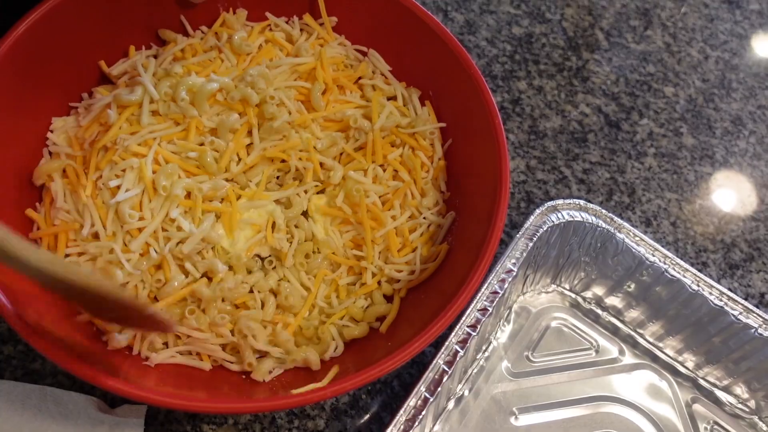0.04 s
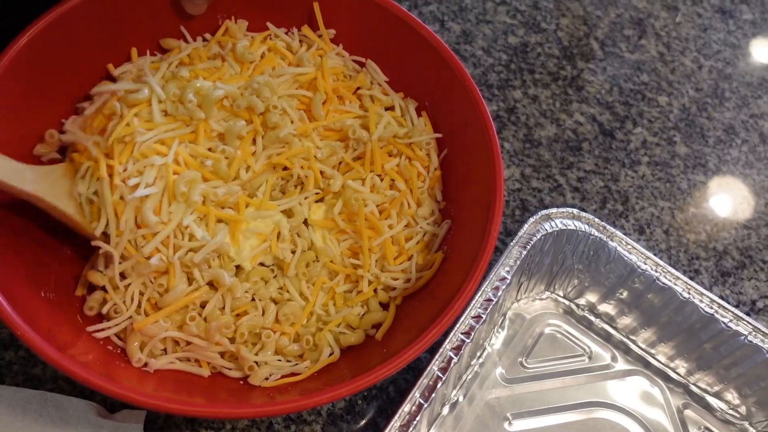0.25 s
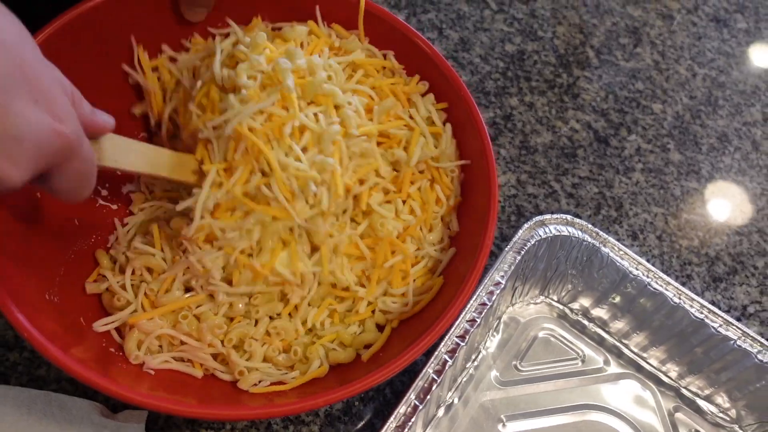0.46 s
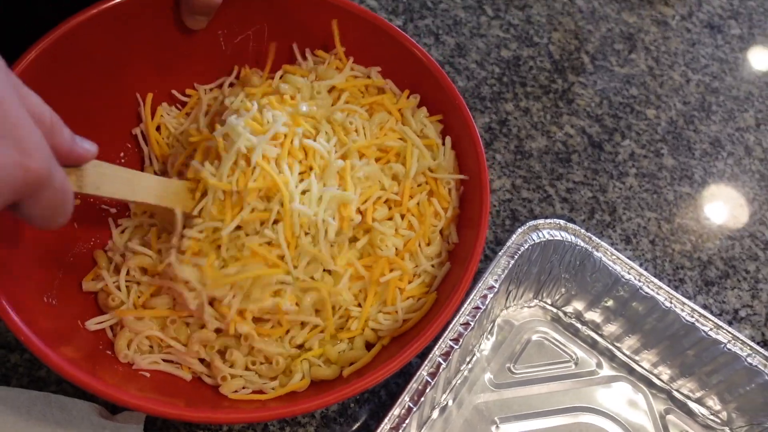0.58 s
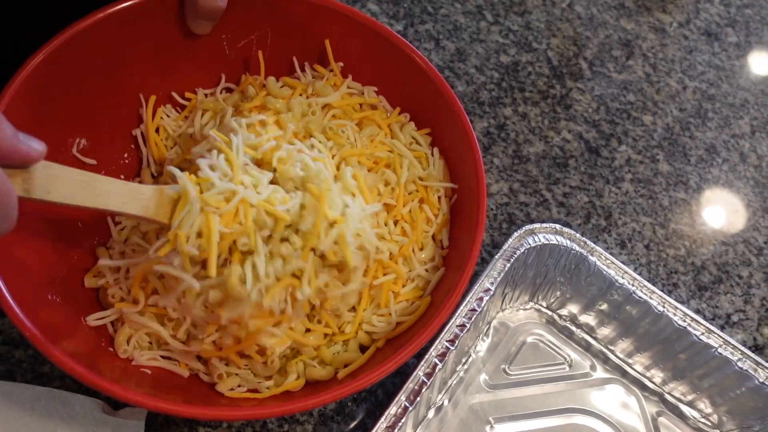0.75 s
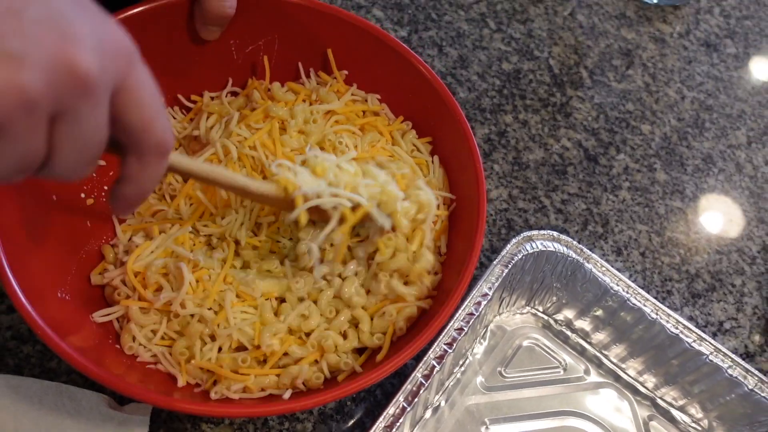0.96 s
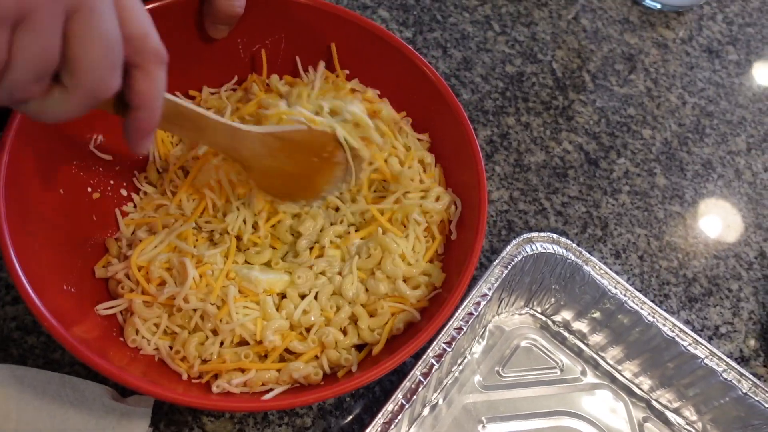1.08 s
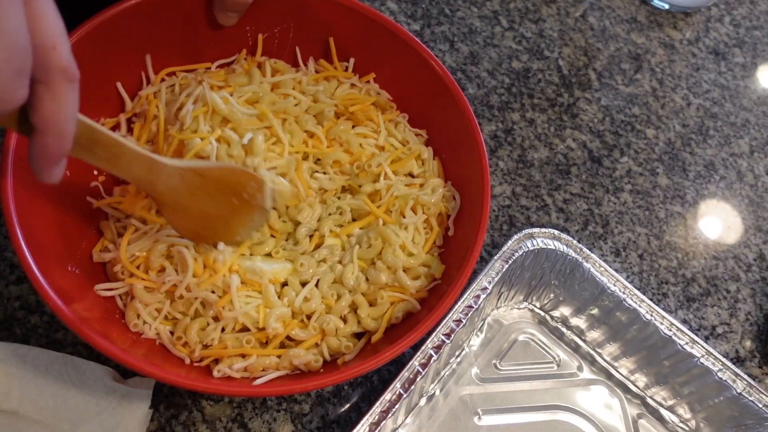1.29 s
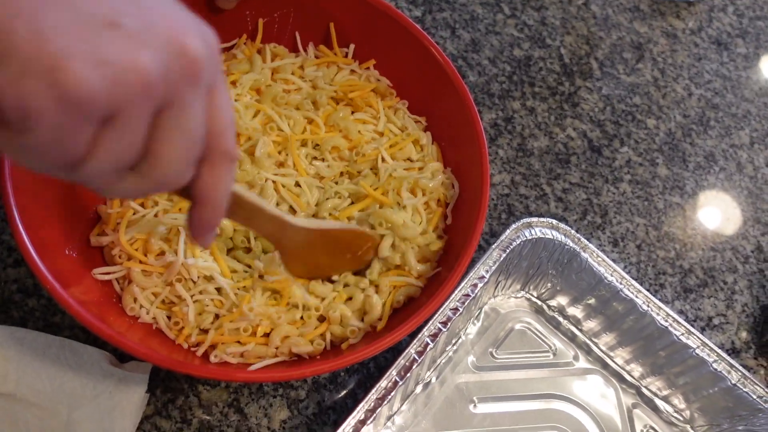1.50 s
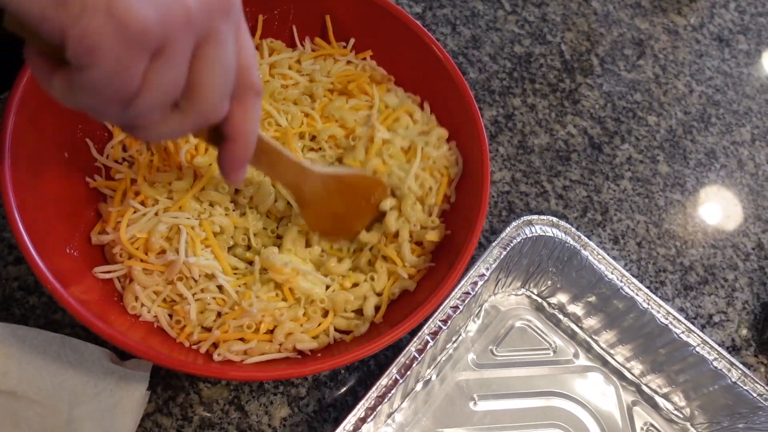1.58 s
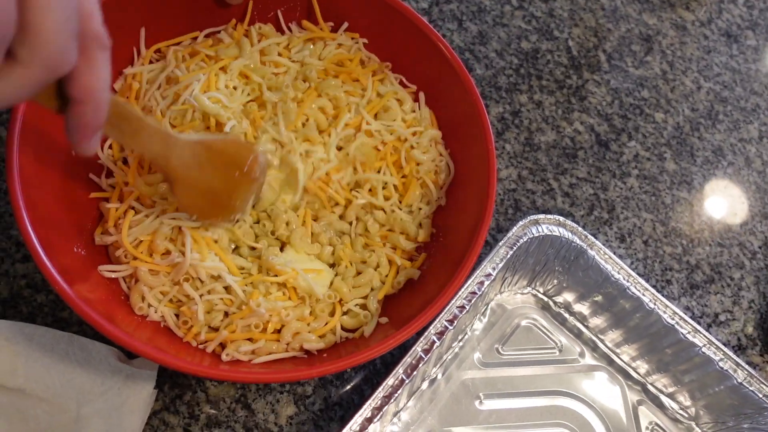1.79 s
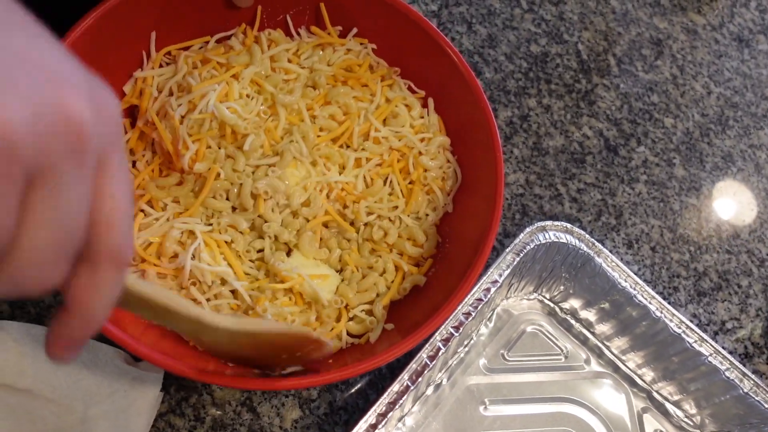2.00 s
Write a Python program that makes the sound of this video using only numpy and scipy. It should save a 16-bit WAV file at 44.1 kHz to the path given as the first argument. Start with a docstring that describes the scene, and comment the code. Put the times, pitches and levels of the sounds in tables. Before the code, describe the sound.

A spoon clacks twice on a plastic bowl, scrapes through wet pasta, then quiets to faint stirring

```python
"""Quiet room air, then a wooden spoon knocks and scrapes on a plastic bowl, stirring pasta and shredded cheese.
Knocks and scraping excite the same bowl and spoon modes; wet food pops as short pitched bursts with a snap.
A late bright rustle is dense crackle; a faint narrow hum and a thin whistle are wavering sines.
The kitchen air is shaped noise; feedback delays add the echoes of the food sounds."""
import sys
import numpy as np
from scipy import signal
from scipy.fft import rfft, irfft, next_fast_len
from scipy.io import wavfile

SR = 44100
rng = np.random.default_rng(int(sys.argv[2]) if len(sys.argv) > 2 else 0)


def generate_wav(sig):
    """Save sig (samples, or channels by samples) to the path in sys.argv[1] as 16-bit PCM at SR."""
    pcm = np.round(np.clip(np.atleast_2d(sig).T, -1, 1) * 32767).astype(np.int16)
    wavfile.write(sys.argv[1], SR, pcm)


N = 90404

# modes of bowl and spoon: (frequency [Hz], gain [dB], t60 before damping factor [s])
BOWL_MODES = [(130, 0, 0.093), (316.7, 5, 0.036), (404.2, 0.5, 0.077), (581, 4, 0.034), (740, -11, .012),
              (950, 6, .034), (1310, -1.5, 0.015), (1730, 7, 0.0077), (2018, 3, 0.014), (2280, 7, 0.011),
              (2930, 17, 0.0077), (3553, 14, 0.0087), (4570, 9.5, 0.0036), (5120, 18, 0.0019),
              (6270, 15.5, 0.0017), (7550, 11, 0.0012)]
# edges of the thump, low, middle, main and high mode regions: [Hz]
REGION_EDGES_HZ = (85, 220, 650, 1250, 2700, 10500)
# spoon knocks: (time [s], peak level [dB], contact length [s],
#                low, middle, high modes relative to main [dB])
KNOCK_EVENTS = [(0.099, -27, 0.0092, -30, -24, -15), (0.103, -33.5, 0.0028, -50, -35, -2),
                (0.128, -23.5, 0.0015, -46, -16, -7), (0.1305, -19, 0.0013, -50, -30, -6),
                (0.162, -8.5, 0.005, -32, 2.5, 6.5), (0.3572, -9.5, 0.0038, -11, -10.5, -2.5),
                (0.6055, -28, 0.0016, -37, -19, -5), (0.919, -39.5, 0.0055, -17, -12, -10),
                (0.949, -33.5, 0.001, -47, -26, 3), (0.957, -36.5, 0.0022, -21, -3.5, -22),
                (0.961, -36, 0.00055, -40, -25, -17), (0.993, -25, 0.0031, -42, -14, 5),
                (1.079, -34, 0.003, -47, -16, -15), (1.1527, -26, 0.0015, -40, -13, 7.5),
                (1.215, -32.5, 0.0014, -31, -17.5, -6), (1.3205, -43, 0.001, -31, -20, -17),
                (1.328, -21, 0.00075, -44, -21.5, -10.5), (1.3312, -28, 0.005, -25, -45, -18),
                (1.3538, -30.5, 0.0028, -25, -28, -25), (1.3573, -36, 0.0015, -30, -13, -14),
                (1.3803, -28, 0.0025, -23.5, -20, -12), (1.52, -46.5, 0.0033, -3, 5, -19)]
# scraping before wander: (time [s], rms level of thump, low, middle, main, high modes [dB])
SCRAPE_LEVELS = [(0, -85, -60, -61, -51, -52.5), (0.085, -69, -67.5, -74, -63, -57.5),
                 (0.153, -72, -59.5, -57, -46, -49), (0.171, -50, -75, -41, -29, -41),
                 (0.194, -47, -52.5, -35.5, -33, -37.5), (0.248, -57.5, -52, -38.5, -36, -41.5),
                 (0.347, -66, -57.5, -43, -45, -45), (0.363, -43, -30.5, -44, -42, -43.5),
                 (0.397, -48.5, -49.5, -41, -38.5, -41.5), (0.418, -55, -40.5, -46.5, -44, -47),
                 (0.493, -54, -54, -53, -46.5, -49.5), (0.512, -63, -42.5, -42, -48, -46),
                 (0.544, -64, -54, -50.5, -41.5, -49), (0.575, -58, -59.5, -57, -53, -52.5),
                 (0.72, -78, -69, -67, -60.5, -63), (0.88, -66, -83, -62, -63.5, -63.5),
                 (0.91, -60.5, -90, -73, -70, -59), (0.948, -64, -102, -54.5, -45.5, -57.5),
                 (1.1, -62, -107, -63, -57, -59), (1.18, -72, -86, -64.5, -58, -53.5),
                 (1.312, -75, -73, -67, -59.5, -61.5), (1.346, -75, -63.5, -59, -51, -56.5),
                 (1.468, -79.5, -69.5, -62.5, -56, -62.5), (1.6, -74.5, -77, -65.5, -62, -60.5),
                 (1.85, -69.5, -76, -67.5, -62.5, -59), (2.05, -79, -78, -88, -97, -66)]
# wet pops: (time [s], peak level of the ringing body [dB], pitch [Hz])
POP_EVENTS = [(0.1095, -31, 3600), (0.3834, -35, 3300), (0.3965, -27, 3140), (0.4726, -33.5, 3200),
              (0.606, -25.5, 2920), (0.6099, -31, 2950), (0.6225, -42.5, 8540), (0.6304, -29, 3970),
              (0.6306, -31.5, 5500), (0.6408, -31.5, 5130), (0.652, -39, 3700), (0.6523, -45, 8640),
              (0.6606, -35.5, 2040), (0.6719, -41, 3120), (0.6768, -41.5, 3340), (0.7354, -42.5, 3020),
              (0.766, -41, 1130), (0.8273, -39.5, 4070), (0.8424, -38, 3460), (0.8507, -36, 5140),
              (0.851, -46.5, 10800), (0.8628, -42.5, 1470), (0.8966, -46, 3220), (0.9012, -38.5, 4460),
              (1.029, -33, 3770), (1.2233, -32.5, 2370), (1.283, -43, 4100), (1.395, -41.5, 11200),
              (1.4037, -44.5, 5100), (1.4192, -45, 4120), (1.4414, -45.5, 8600), (1.4671, -39.5, 5070),
              (1.5023, -46, 949), (1.5322, -44, 5930), (1.5562, -44, 3120), (1.6479, -40.5, 3770),
              (1.6873, -42, 5640), (1.8449, -44, 5900), (1.935, -44, 3800), (1.99, -46, 10100)]
# room air spectrum, normalised later: (frequency [Hz], relative level [dB])
ROOM_SPECTRUM = [(60, -38), (250, -2.5), (700, 2.5), (1800, 2), (3700, -9.5), (6300, -1.5), (9000, -15.5),
                 (15700, -19.5)]
# faint hum, centre of its wander: (time [s], frequency [Hz], peak level [dB])
HUM_TRACK = [(.75, 650, -75), (1.0, 646, -63.5), (1.3, 639.5, -72), (1.35, 610, -54), (1.45, 629.7, -63.5),
             (2.05, 636, -64.5)]
# thin whistle, centre of its wander: (time [s], frequency [Hz], peak level [dB])
WHISTLE_TRACK = [(.98, 1090, -85), (1.04, 1102, -55), (1.09, 1120, -63), (1.14, 1147, -59),
                 (1.27, 1148, -61), (1.33, 1148, -90)]

ROOM_RMS_DB, ROOM_PAN_DB = -58, 1
ROOM_WIDTH, ROOM_SIDE_CUT_HZ = 0.9, 5400
RUSTLE_TIME_S, RUSTLE_HALF_S, RUSTLE_RMS_DB = 1.85, 0.029, -56.5
RUSTLES_PER_S, RUSTLE_CYCLES = 3200, 21
POP_PUSH_S, POP_SNAP_DB = 0.00073, -8
POP_CYCLES, POP_LONGEST_S = 17.4, 0.006
SLIPS_PER_S, SLIP_SPREAD_DB, SCRAPE_PATCHY_DB = 5000, 3.2, 2.0
SCRAPE_T60_FACTOR = 0.41  # the pressed spoon shortens the ring
KNOCK_TOUCH_S, KNOCK_GRIT_RISE_S, KNOCK_GRIT_GAIN = 0.00004, 0.00024, 0.5
KNOCK_T60_FACTOR = 1.2
KITCHEN_T60_S, WALL_CUT_HZ, KITCHEN_DB = 0.29, 19000, -23.5
SIDE_DB, SIDE_LOW_CUT_HZ = -3.5, 500
BOWL_PAN_DB = 0.5
FOOD_TOP_HZ = 10500  # the wet load dulls the top
MIC_LOW_CUT_HZ, CUTOFF_HZ = 204, 16050


def amp(db):
    """Gain of a level in dB."""
    return 10 ** (np.asarray(db, float) / 20)


def rms_one(x):
    """Scale to rms 1."""
    return x / np.sqrt(np.mean(x ** 2) + 1e-20)


def band(x, low_hz, high_hz):
    """Band-pass with skirts of 12 dB an octave."""
    sos = signal.butter(2, [low_hz, high_hz], "band", fs=SR, output="sos")
    return signal.sosfilt(sos, x)


def drift(rate_hz):
    """Slow random wander of rms 1: noise through two equal one-pole low-passes."""
    pole = np.exp(-2 * np.pi * rate_hz / SR)
    settle = SR // 2
    noise = rng.standard_normal(N + settle)
    return rms_one(signal.lfilter([1], [1, -2 * pole, pole * pole], noise)[settle:])


def ring(x, hz, t60_s):
    """Two-pole resonator: a unit click sets off a decaying sine of initial height 1."""
    radius = amp(-60 / (max(t60_s, 0.0005) * SR))
    w = 2 * np.pi * min(hz, 18000) / SR
    return signal.lfilter([0, np.sin(w)], [1, -2 * radius * np.cos(w), radius ** 2], x + 1e-18)


def clicks(rate_per_s, spread_db):
    """Random clicks of uneven size and sign."""
    size_db = spread_db * np.minimum(rng.exponential(1, N), 5)
    sizes = amp(size_db) * rng.choice([-1, 1], N)
    return sizes * (rng.random(N) < rate_per_s / SR)


def bowl(pushes, t60_factor):
    """Five regions of bowl and spoon modes, rung by two pushes dealt in turn."""
    regions = np.zeros((5, len(pushes[0])))
    for k, (hz, db, t60_s) in enumerate(BOWL_MODES):
        region = np.searchsorted(REGION_EDGES_HZ, hz) - 1
        sign = (-1) ** (k // 2) if hz < 5000 else 1
        regions[region] += sign * amp(db) * ring(pushes[k % 2], hz, t60_s * t60_factor)
    edges = zip(REGION_EDGES_HZ, REGION_EDGES_HZ[1:])
    return np.array([band(r, low * 0.8, high * 1.1) for r, (low, high) in zip(regions, edges)])


def room_tone():
    """Steady coloured air noise, wide between the sides from 90 to 5400 Hz."""
    hz, db = np.transpose(ROOM_SPECTRUM)
    f = np.arange(N // 2 + 1) * SR / N + 1
    colour = amp(np.interp(np.log(f), np.log(hz), db))
    mid, side = irfft(rfft(rng.standard_normal((2, N))) * colour, N)
    side = ROOM_WIDTH * band(side, 90, ROOM_SIDE_CUT_HZ)
    air = rms_one(mid + side * np.array([[1], [-1]]))
    return amp([[ROOM_RMS_DB - ROOM_PAN_DB], [ROOM_RMS_DB + ROOM_PAN_DB]]) * air


def tone(track):
    """Sine with randomly wavering frequency and flickering level."""
    s, hz, db = np.transpose(track)
    t = np.arange(N) / SR
    pitch_hz = np.interp(t, s, hz) + 4 * drift(15)
    level_db = np.interp(t, s, db) + 2.5 * drift(12)
    return amp(level_db) * np.sin(2 * np.pi * np.cumsum(pitch_hz) / SR)


def kitchen(x):
    """Echoes from eight dulling feedback delays a side."""
    size = next_fast_len(N + SR)
    w = 2j * np.pi * np.arange(size // 2 + 1) / size
    dull = 1 / (1 + w * SR / (2 * np.pi * WALL_CUT_HZ))
    response = np.zeros((2, len(w)), complex)
    for k, lag in enumerate(rng.uniform(0.005, 0.027, 16) * SR):
        loop = amp(-60 * lag / SR / KITCHEN_T60_S) * dull * np.exp(-w * lag)
        response[k % 2] += loop / (1 - loop) * (-1) ** (k // 2)
    return irfft(response * rfft(x, size), size)[:, :N]


def rustle():
    """Settling cheese: tiny crackles at eight pitches, dealt at random, swell and fade."""
    born = clicks(RUSTLES_PER_S, 2.44)
    dealt = rng.integers(0, 8, N)
    rings = np.zeros(N)
    for k, hz in enumerate(np.geomspace(4500, 7500, 8)):
        rings += ring(born * (dealt == k), hz, RUSTLE_CYCLES / hz)
    swell = np.exp(-((np.arange(N) / SR - RUSTLE_TIME_S) / RUSTLE_HALF_S) ** 2)
    return amp(RUSTLE_RMS_DB) * swell * rms_one(rings)


def pops():
    """Bursting pockets in the sauce: a noise push rings a few cycles, with a wider snap."""
    out, t = np.zeros(N + SR), np.arange(SR // 20) / SR
    for s, db, hz in POP_EVENTS:
        push = rng.standard_normal(len(t)) * np.exp(-(t / POP_PUSH_S - 1.5) ** 2)
        body = ring(push, hz, min(POP_CYCLES / hz, POP_LONGEST_S))
        body = band(body, hz / 1.22, hz * 1.81)
        snap = band(push, hz / 2, min(hz * 2, 15000))
        pop = body / np.abs(body).max() + amp(POP_SNAP_DB) * snap / np.abs(snap).max()
        i = int(s * SR)
        out[i:i + len(t)] += amp(db) * pop
    return out[:N]


def scrape():
    """Dense slips of wood on wet plastic ring the modes, each region at its own level."""
    s, *levels = np.transpose(SCRAPE_LEVELS)
    slips = [clicks(SLIPS_PER_S, SLIP_SPREAD_DB) for _ in range(2)]
    regions = bowl(slips, SCRAPE_T60_FACTOR)
    lumps_db = SCRAPE_PATCHY_DB * drift(51)  # common to all regions
    out, t = np.zeros(N), np.arange(N) / SR
    for region, db in zip(regions, levels):
        level_db = np.interp(t, s, db) + lumps_db + 0.55 * drift(45)
        out += rms_one(region) * amp(level_db)
    return out


def knocks():
    """A sharp touch and short rough contact ring the modes, weighted by region."""
    out, t = np.zeros(N + SR), np.arange(SR // 10) / SR
    touch = np.exp(-(t / KNOCK_TOUCH_S - 2) ** 2)
    for s, db, length_s, low, middle, high in KNOCK_EVENTS:
        contact = (1 - np.exp(-t / KNOCK_GRIT_RISE_S)) * np.exp(-t / max(length_s / 2, 1e-4))
        pushes = touch + KNOCK_GRIT_GAIN * rng.standard_normal((2, len(t))) * contact
        regions = bowl(pushes, KNOCK_T60_FACTOR)
        regions /= np.abs(regions).max(axis=1, keepdims=True)
        hit = amp([low, middle, 0, high]) @ regions[1:]  # no thump region
        i = int(s * SR)
        out[i:i + len(t)] += amp(db) * hit / np.abs(hit).max()
    return out[:N]


def scene():
    """Bowl slightly left; its echoes differ between the sides mainly above the bass."""
    food = knocks() + scrape() + pops() + rustle() + tone(WHISTLE_TRACK) + tone(HUM_TRACK)
    food = band(food, 40, FOOD_TOP_HZ)
    left, right = amp(KITCHEN_DB) * kitchen(food)
    side = amp(SIDE_DB) * band(left - right, SIDE_LOW_CUT_HZ, CUTOFF_HZ)
    echoes = (left + right) / 2 + side * np.array([[1], [-1]])
    direct = food * amp([[BOWL_PAN_DB], [-BOWL_PAN_DB]])
    return direct + echoes + room_tone()


def record(dry):
    """The microphone loses the deep bass; a steep low-pass cuts the top."""
    low_cut = signal.butter(2, MIC_LOW_CUT_HZ, "high", fs=SR, output="sos")
    top_cut = signal.cheby2(20, 70, CUTOFF_HZ, fs=SR, output="sos")
    return signal.sosfilt(top_cut, signal.sosfilt(low_cut, dry))


dry = scene()
out = record(dry)
generate_wav(out)
```